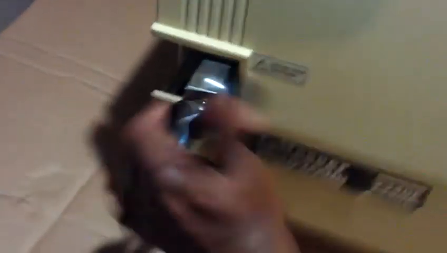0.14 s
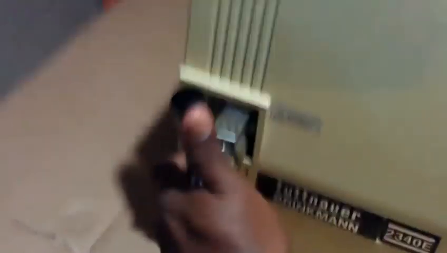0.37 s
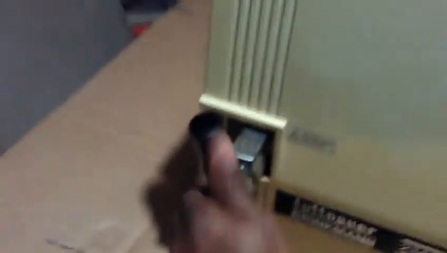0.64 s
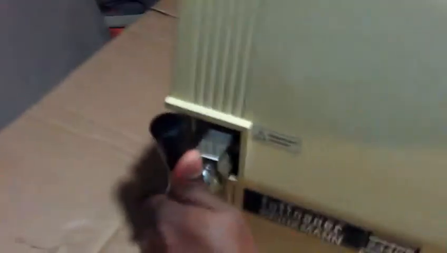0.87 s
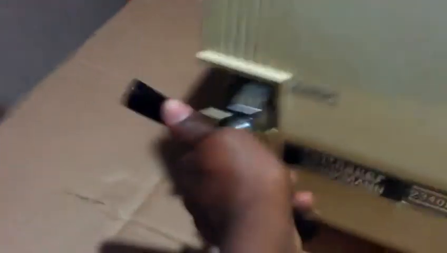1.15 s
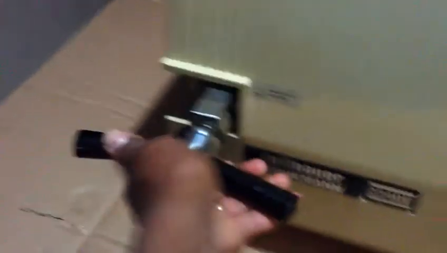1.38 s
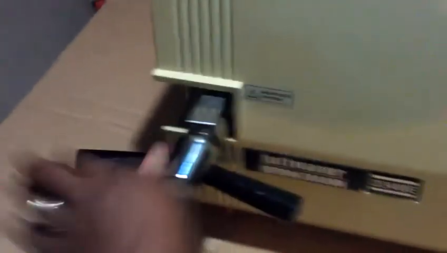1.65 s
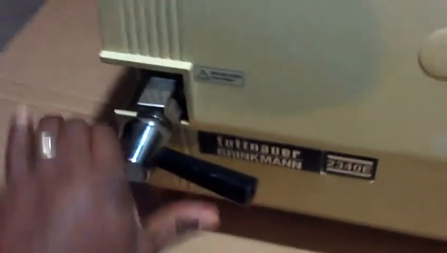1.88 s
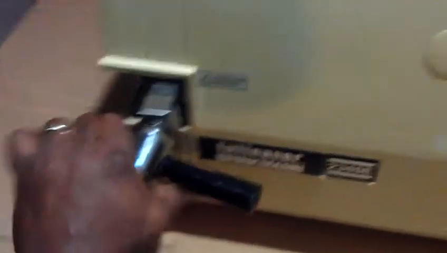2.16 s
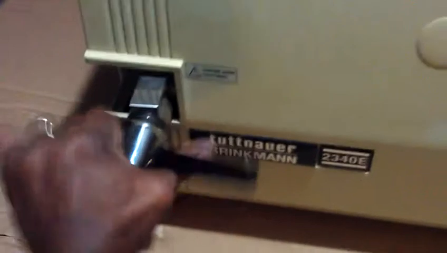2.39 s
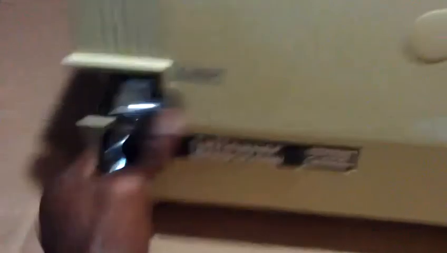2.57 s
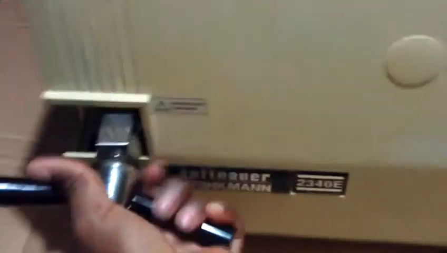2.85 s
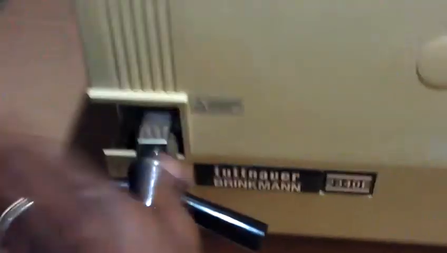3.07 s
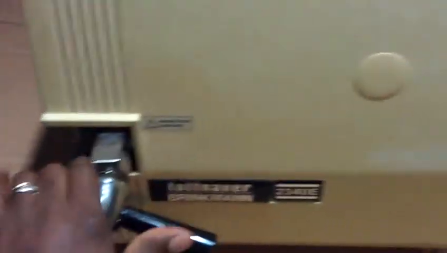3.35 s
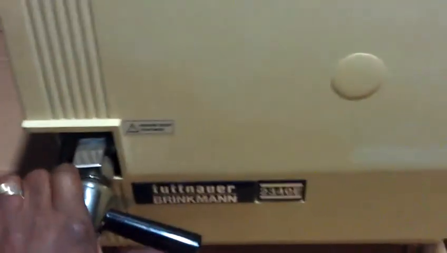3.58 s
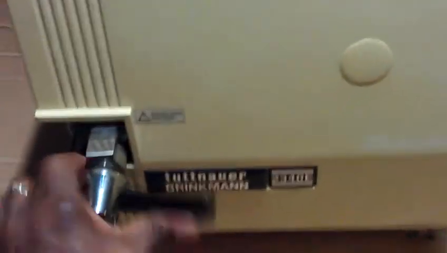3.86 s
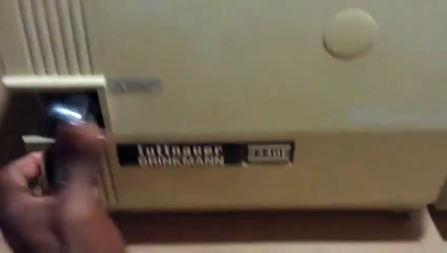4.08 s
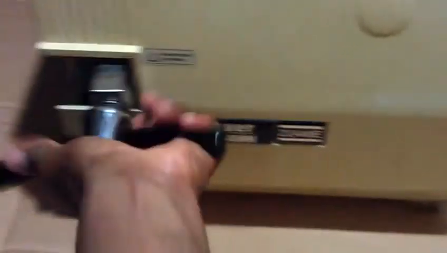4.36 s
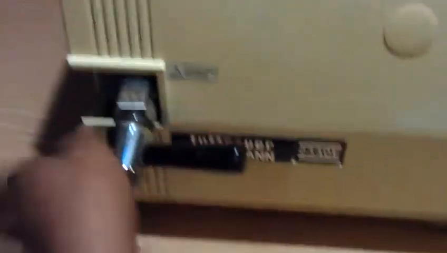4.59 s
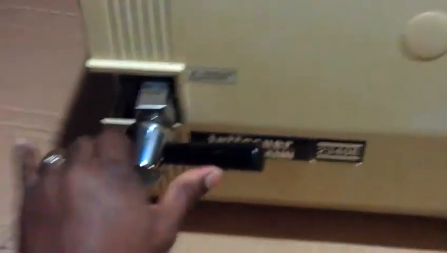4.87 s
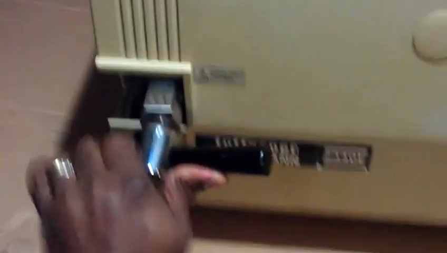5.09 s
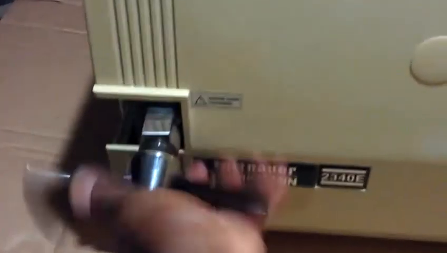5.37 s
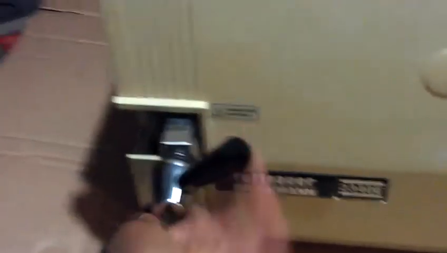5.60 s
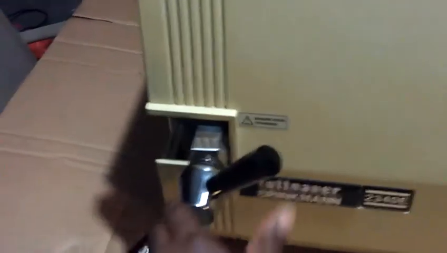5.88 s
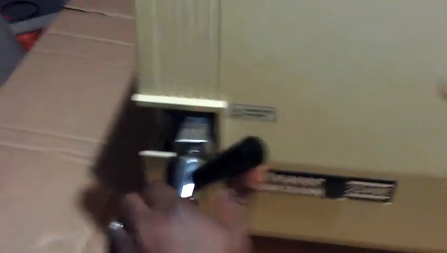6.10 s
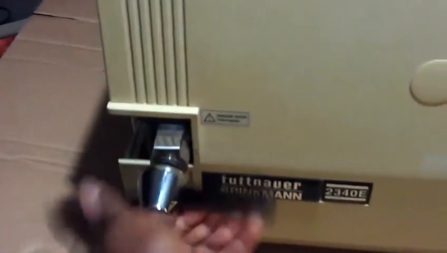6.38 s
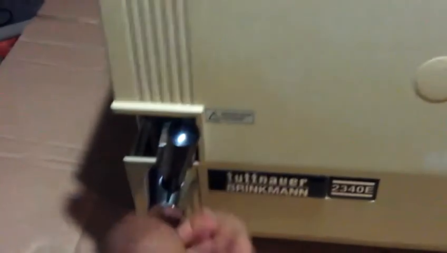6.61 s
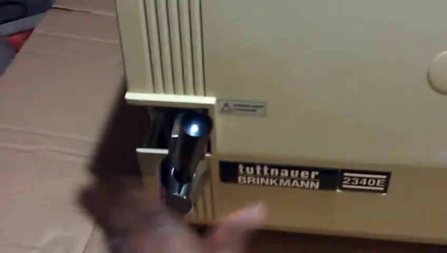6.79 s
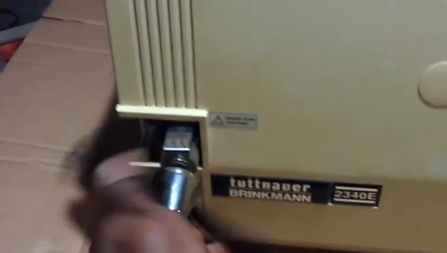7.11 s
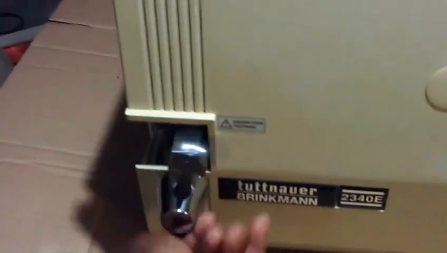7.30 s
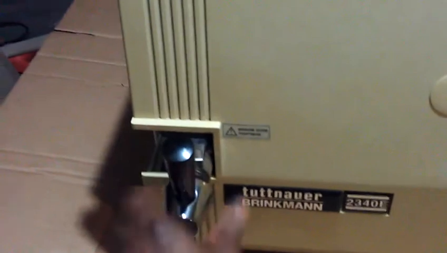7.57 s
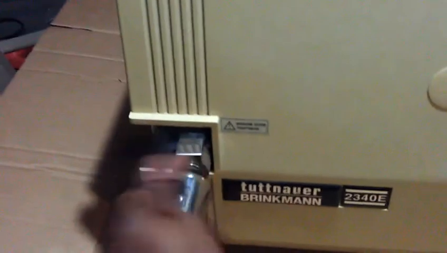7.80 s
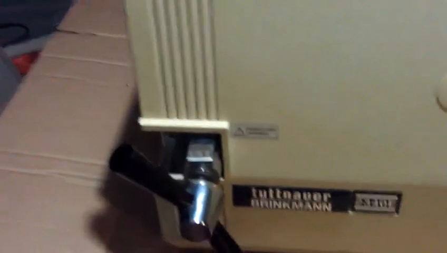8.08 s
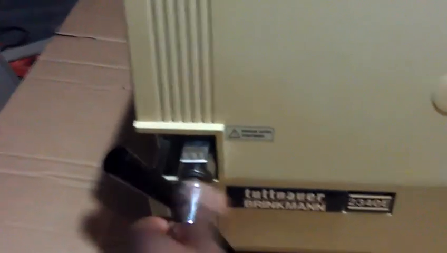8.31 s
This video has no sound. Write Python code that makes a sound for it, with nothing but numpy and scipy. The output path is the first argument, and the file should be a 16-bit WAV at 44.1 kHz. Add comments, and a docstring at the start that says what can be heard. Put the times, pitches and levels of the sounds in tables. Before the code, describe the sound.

Two bright, hard clanks within the first second, a quieter stretch of taps, then another clank and a rubbing turn. Further turns of the handle scrape and groan more heavily, with a strong clank past five seconds, then squeaks, a small metallic ping and soft door knocks. Close handheld pickup in a small room, with quiet hiss and a steady thin insect-like tone.

```python
"""Screw handle on a steel appliance door

A hand spins the handle close by. Noise bursts through steel resonances make the latch clank; the door booms.
Stick-slip noise makes the thread rub, and groan and shake the door more as load rises.
Sines make squeaks, tinks and pings; shaped noise makes finger taps and catches, palm brushes and soft pushes.
Behind are a faint high chorus like night insects, a low flutter, one far clack and the hiss of a small room."""
import sys
import numpy as np
from scipy import signal
from scipy.fft import rfft, irfft, next_fast_len
from scipy.io import wavfile
from scipy.ndimage import uniform_filter1d, map_coordinates

SR = 44100
rng = np.random.default_rng(int(sys.argv[2]) if len(sys.argv) > 2 else 0)


def to_wav(s):
    """Save 16-bit WAV."""
    ch = np.atleast_2d(s).T  # columns
    pcm = np.round(np.clip(ch, -1, 1) * 32767)  # PCM
    wavfile.write(sys.argv[1], SR, pcm.astype(np.int16))


N = 372644
TIME_S = np.arange(N) / SR
TOP_HZ = 13950
GRIP_S, SPEED_UP_DB = 0.043, 8  # a turn takes hold this fast, then swells as the handle gains speed

# Spectrum of the room hiss. Each row: frequency in Hz, relative density in dB per Hz.
AIR_SPECTRUM = [(25, -52), (50, -63), (85, -20.5), (150, -8), (380, -8.5), (620, -11), (830, -3.5),
                (1200, -10), (1700, -5.5), (2500, -15), (4000, -16.5), (5600, -25), (7400, -36),
                (10500, -17.5), (14000, -28.5)]
# Spectrum of the insect chorus. Each row: frequency in Hz, relative density in dB per Hz.
CHORUS_SPECTRUM = [(5600, -11.5), (6050, -7.5), (6330, 8.5), (6550, 8.5), (6720, 2), (6900, -84),
                   (7100, -60)]
# Decay of the room. Each row: frequency in Hz, t60 in seconds.
ROOM_DECAY = [(150, 1), (450, 0.72), (1500, 0.35), (5000, 0.25), (12000, 0.29)]
# Stereo likeness of all noise. Each row: frequency in Hz, left-right correlation from -1 to 1.
STEREO_LIKENESS = [(60, -0.56), (180, 0.99), (300, 0.89), (480, -0.15), (900, -0.14), (2000, 0.13),
                   (11000, 0.23)]
# Stereo lean of the near sounds. Each row: frequency in Hz, left over right in dB.
LATCH_LEAN = [(150, 3), (500, 2), (1200, -2.5), (2500, 1.5), (4500, -1.5), (9000, 0), (13000, 14.5)]
# Fingers and a ring tap the handle. Each row: start in seconds (plus a fixed lag), relative level in dB.
TAPS_LIST = [(0.0265, -28), (1.492, -26.5), (1.5064, -28), (1.5345, -25), (2.2014, -25.5), (2.926, -24.5),
             (3.369, -32), (3.444, -31), (3.753, -24.5), (4.487, -33), (4.6877, -24.5), (4.7562, -30.5),
             (7.475, -30.5)]
# The palm slides over the grip. Each row: start in seconds, length in seconds, level in dB.
PALM_BRUSHES = [(0.466, 0.068, -39.5), (3.082, .06, -53), (3.362, 0.14, -51), (6.634, 0.093, -50),
                (8.114, .07, -49)]
# Spectrum of skin and thread hiss. Each row: frequency in Hz, relative density in dB per Hz.
RUB_HISS_SPECTRUM = [(5000, -40), (7500, -8.5), (9000, -1.5), (10500, 4), (12000, 0), (14000, -11.5)]
# The hand rocks the door on its hinges. Each row: start in seconds, relative level in dB.
DOOR_THUDS = [(0.255, -32.5), (0.47, -34), (1.668, -31.5), (2.935, -33.5), (2.986, -35.5), (3.041, -33.5),
              (3.303, -34.5), (4.204, -32), (5.239, -39), (5.876, -36), (6.336, -29.5), (6.382, -34),
              (6.418, -32.5), (7.21, -28), (7.275, -25.5), (7.842, -31.5), (7.982, -35)]
# Low modes of the door panel. Each row: nominal frequency in Hz, relative level in dB, t60 in seconds.
DOOR_MODES = [(143.8, -4, 0.49), (176, 0.5, 0.42), (184, 3, 0.25), (222, 0, 0.23)]
# Low response of the door. Each row: frequency in Hz, relative level in dB.
DOOR_RUMBLE = [(53, -53), (90, -42), (177, 4), (220, -8), (295, -0.5), (407, -7), (497, -3.5), (723, -13),
               (800, -16.5), (1040, -8), (1760, -120)]
# Resonances of latch and bracket. Each row: frequency in Hz, width before damping in Hz, relative level in dB.
STEEL_MODES = [(300, 14, -4), (358, 8.5, 10), (438.6, 8.3, 11.5), (574, 54, 4.5), (837, 22, 4),
               (1067, 54, 4.5), (1433, 290, 0), (1697, 165, 6), (2540, 200, -5.5), (2836, 123, 0.5),
               (3550, 640, -13), (4080, 62, 2), (4500, 94, -9), (4890, 67, 4), (4950, 640, -0.5),
               (5400, 67, -5.5), (9900, 670, -23), (10180, 100, -5), (11120, 350, -5), (10900, 2040, -9),
               (12500, 150, -20)]
# Turns of the handle. Each row: start in seconds, length in seconds, relative rub in dB, thread load in dB.
HANDLE_TURNS = [(2.473, 0.28, -43, -17), (3.914, 0.47, -44.5, -4.5), (5.131, 0.32, -43, -2),
                (6.172, .29, -43.5, 0), (7.096, .2, -44.5, 7), (7.817, 0.13, -41.5, 6.5)]
# Colour of the thread's scrape. Each row: frequency in Hz, relative level in dB.
SCRAPE_SPECTRUM = [(500, -36), (900, 2.5), (1500, -1), (2200, 6), (3200, -0.5), (5000, -3.5), (7000, -28)]
# Resonances of the loaded screw. Each row: frequency in Hz, width before squaring in Hz, relative level in dB.
GROAN_MODES = [(1075, 60, -1), (1472, 113, 0.5)]
# Squeaks, tinks and pings of the metal. Each row: start in seconds, length in seconds, pitch in Hz, width in Hz,
# level in dB.
METAL_TONES = [(2.026, 0.016, 1556, 28, -31), (2.025, 0.006, 5670, 350, -27),
               (2.614, 0.14, 3130, 140, -41.5), (2.735, 0.092, 3320, 510, -45),
               (3.4, 0.0071, 2560, 640, -29), (3.44, 0.0067, 2340, 430, -31),
               (3.493, 0.0085, 2330, 410, -36.5), (5.55, 0.052, 1120, 14, -44),
               (6.195, 0.11, 1525, 82, -35), (6.408, 0.027, 1540, 89, -23), (6.427, 0.055, 3610, 27, -40.5),
               (6.46, 0.038, 3090, 170, -34), (7.151, 0.031, 3560, 48, -34), (7.972, 0.037, 3020, 9.9, -33)]
# Groups of modes in a clank. Each row: low edge in Hz, high edge in Hz.
CLANK_BANDS = [(250, 700), (720, 1250), (1300, 2000), (2200, 3700), (3700, 6300), (8200, 12500)]
# Relative level of each group in dB, at zero brightness.
CLANK_BAND_DB = [-28.5, -24.5, -18.5, -19.5, -19.5, -20.5]
# The latch hits a stop. Each row: start in seconds (plus a fixed lag), strength in dB, brightness in dB per
# octave, bracket clunk in dB, relative door level in dB, chatter time in seconds.
LATCH_CLANKS = [(0.135, -15, 3, 0.5, -26, 0.0044), (1.027, -12, -0.07, -2, -37, .0065),
                (2.027, -34.5, -5, -4, -49, 0.0052), (2.381, -17, -0.5, 1, -30, 0.0085),
                (3.873, -22, -0.9, 3.5, -38, 0.0061), (5.376, -11.5, .3, -5, -23.5, 0.0056),
                (6.29, -25.5, -0.1, 0.5, -55, 0.0052), (6.414, -41.5, -8.5, 10, -42, 0.005),
                (7.157, -28, -3.5, 0, -61, .004), (7.24, -29, 0.5, -0.5, -48, 0.0015),
                (7.956, -28.5, -2.5, 0.5, -37, 0.0087)]


def amp(db):
    """Decibels to gain."""
    return 10 ** (np.asarray(db) / 20)


def unit(x):
    """x at rms 1."""
    return x / np.sqrt(np.mean(x ** 2) + 1e-20)


def along(points, hz):
    """Interpolate (Hz, value) points on a log-frequency axis."""
    points_hz, values = np.transpose(points)
    return np.interp(np.log(hz + 1), np.log(points_hz + 1), values)


def wobble(knots_per_s):
    """A smooth random curve through normal draws."""
    knots = rng.standard_normal(int(N * knots_per_s / SR) + 4)
    return map_coordinates(knots, [TIME_S * knots_per_s])


def filtered(x, response):
    """x times a complex response of frequency."""
    n = x.shape[-1]
    padded = next_fast_len(n + SR // 10)
    spectrum = rfft(x, padded) * response(np.fft.rfftfreq(padded, 1 / SR))
    return irfft(spectrum, padded)[..., :n]


def noise(n, response=np.ones_like):
    """Coloured stereo noise of rms 1; mid and side are mixed for the likeness at each frequency."""
    def mid_side(hz):
        angle = np.arccos(np.clip(along(STEREO_LIKENESS, hz), -1, 1)) / 2
        return response(hz) * np.array([np.cos(angle), np.sin(angle)])

    mid, side = filtered(rng.standard_normal((2, n)), mid_side)
    return unit(np.array([mid + side, mid - side]))


def colour(points):
    """The response of a (Hz, dB) spectrum."""
    return lambda hz: amp(along(points, hz))


def peak(centre_hz, width_hz):
    """The response of one resonance."""
    return lambda hz: 1j * hz * width_hz / (centre_hz ** 2 - hz * hz + 1j * hz * width_hz)


def band(x, edges_hz):
    """A causal band-pass."""
    return signal.sosfilt(signal.butter(3, edges_hz, "band", fs=SR, output="sos"), x)


def add(track, start_s, sound):
    """Mix a sound into the track from start_s."""
    part = track[:, max(round(start_s * SR), 0):][:, :sound.shape[-1]]
    part += sound[..., :part.shape[1]]


def background(air_db=-46, whine_db=-59):
    """Room hiss as slowly drifting noise, with a faint wavering whine from a narrow resonance."""
    air = amp(air_db) * amp(.4 * wobble(4)) * noise(N, colour(AIR_SPECTRUM))
    whine = amp(whine_db) * noise(N, lambda hz: peak(1603, 22)(hz) ** 2)
    return air + whine


def flutter(rate_hz=17.0, decay_s=0.017, blur=0.58, start_db=-43.0, fade_db_per_s=1.45):
    """Soft low thuds in quick, uneven succession, slowly fading: noise under repeated short swells."""
    age_s = (rate_hz * TIME_S + .3 * wobble(9)) % 1 / rate_hz
    beats = blur + age_s / decay_s * np.exp(.5 - (age_s / decay_s) ** 2 / 2)
    body = noise(N, colour([(40, -60), (120, -6.5), (180, 7.5), (430, 12.5), (560, 3.5), (700, 2), (2000, -19)]))
    level_db = start_db - fade_db_per_s * TIME_S + 2.1 * wobble(24)
    return amp(level_db) * beats * body


def shimmer():
    """Random gain with quick and slow variation."""
    return amp(1.1 * wobble(65) + .8 * wobble(7))


def insects(chorus_db=-48.5, trill_db=-51, chirp_db=-52, chirp_hz=2.62, first_s=0.73):
    """Narrow noise bands: a high blurred chorus, a lower trill, and one thin voice chirping almost steadily."""
    chorus = amp(chorus_db) * shimmer() * noise(N, colour(CHORUS_SPECTRUM))
    trill = amp(trill_db) * shimmer() * noise(N, lambda hz: peak(2935, 360)(hz) ** 4)
    beat = np.cos(2 * np.pi * (chirp_hz * (TIME_S - first_s) + .1 * wobble(1)))
    voice = noise(N, lambda hz: peak(6135, 45)(hz) ** 2)
    return chorus + trill + amp(chirp_db) * np.clip(2 * beat, 0, 1) * voice


def room(x, build_s=0.001):
    """The room's answer, a fresh noise tail each time; each frequency dies at its own speed."""
    hz, t_s, cells = signal.stft(noise(SR // 2), SR, nperseg=256)
    decay = amp(-60 * t_s / along(ROOM_DECAY, hz)[:, None])
    tail = signal.istft(cells * decay * (1 - np.exp(-t_s / build_s)), SR, nperseg=256)[1]
    return signal.fftconvolve(x, tail / np.linalg.norm(tail[0]), axes=1)[:, :x.shape[1]]


def far_clack(start_s=.33, level_db=-45, direct_db=-8, t60_s=0.036):
    """One clack further off, a decaying noise burst heard mostly through the room."""
    out, t_s = np.zeros((2, N)), np.arange(SR // 2) / SR
    spectrum = [(400, -21), (1500, -4), (2500, -1), (4500, 0), (7000, -20), (10500, -6), (13000, -30)]
    clack = unit(noise(len(t_s), colour(spectrum)) * amp(-60 * t_s / t60_s))
    add(out, start_s, amp(level_db) * (amp(direct_db) * clack + room(clack)))
    return out


def echo(x, delay_s=.0105, echo_db=-11):
    """The floor below sends back one clear, quick reflection, left and right swapped."""
    delayed = np.pad(x[::-1], ((0, 0), (round(delay_s * SR), 0)))[:, :N]
    return x + amp(echo_db) * delayed


def fingers(ticks_per_s=6, ticks_db=-49, spread_db=5.0, life_s=.005):
    """Skin catches on the handle now and then: tiny dry noise ticks of random size."""
    chance, size = rng.random(N), np.minimum(rng.exponential(size=N), 3)
    catches = (chance < ticks_per_s / SR) * amp(ticks_db + spread_db * size)
    fading = signal.lfilter([1], [1, -np.exp(-1 / (life_s * SR))], catches)
    return fading * noise(N, colour([(3000, -31), (8000, -10), (11000, 7), (14000, 3)]))


def taps(room_db=-11, t60_s=.008, lag_s=0.00059):
    """Light, bright touches that hardly ring the metal: very short noise bursts."""
    out, t_s = np.zeros((2, N)), np.arange(SR // 4) / SR
    spectrum = [(500, -25), (2500, 6.0), (7000, -12), (11000, 7.5), (14000, -11)]
    for start_s, db in TAPS_LIST:
        burst = noise(len(t_s), colour(spectrum)) * amp(-60 * t_s / t60_s)
        tick = amp(db - 27) * unit(burst)
        add(out, start_s + lag_s, tick + amp(room_db) * room(tick))
    return out


def brushes():
    """Skin hisses over the grip in a short half-sine swell."""
    level = sum(amp(db) * np.sin(np.pi * np.clip((TIME_S - start_s) / length_s, 0, 1))
                for start_s, length_s, db in PALM_BRUSHES)
    return level * noise(N, colour(RUB_HISS_SPECTRUM))


def steel(hz, least_width=.035):
    """All latch resonances; the gripping hand damps each to at least a small share of its pitch."""
    return sum((-1) ** k * amp(db) * peak(centre_hz, max(width_hz, least_width * centre_hz))(hz)
               for k, (centre_hz, width_hz, db) in enumerate(STEEL_MODES))


def panel(hz, flat_gain=0.85):
    """The door's low response, coloured by the latch bolted to it."""
    return colour(DOOR_RUMBLE)(hz) * (steel(hz) + flat_gain)


def shudder(t_s, attack_s=0.005, t60_s=0.15):
    """The door shakes roughly on its hinges: decaying low noise."""
    return amp(-60 * t_s / t60_s) * (1 - np.exp(-t_s / attack_s)) * noise(len(t_s), panel)


def boom(t_s, swell_s=0.01):
    """The door panel swells into its low modes, detuned at random each time."""
    modes = sum(amp(db - 60 * t_s / t60_s) * np.sin(2 * np.pi * hz * t_s * rng.normal(1, 0.018))
                for hz, db, t60_s in DOOR_MODES)
    return modes * (1 - np.exp(-t_s / swell_s))


def thuds(level_db=2.5):
    """A soft push shakes the door without a clank."""
    out, t_s = np.zeros((2, N)), np.arange(SR // 5) / SR
    for start_s, db in DOOR_THUDS:
        add(out, start_s, amp(level_db + db) * shudder(t_s))
    return out


def stroke(start_s, length_s, release_s):
    """Level of one turn: it takes hold, gains speed and dies away in release_s (t60)."""
    t_s = TIME_S - start_s
    speed_db = SPEED_UP_DB * (np.clip(t_s / length_s, 0, 1) - 1)
    release_db = -60 * np.maximum(t_s - length_s, 0) / release_s
    return np.clip(t_s / GRIP_S, 0, 1) * amp(speed_db + release_db)


def groan_response(hz):
    """The loaded screw's resonances, each squared to narrow it."""
    return sum(amp(db) * peak(centre_hz, width_hz)(hz) ** 2 for centre_hz, width_hz, db in GROAN_MODES)


def thread(slip_hz=75, slip_decay_s=0.0076, dull_gain=0.3, rumble_db=3, groan_db=0, scrape_db=4.5, hiss_db=-1,
           scrape_per_load=0.16, rub_release_s=0.26, door_release_s=0.29, uneven_db=2.15):
    """The screw sticks and slips: uneven jolts ring the latch; more load groans and shakes the door more."""
    hiss, scrape, strain = np.zeros((3, N))
    for start_s, length_s, db, load_db in HANDLE_TURNS:
        rub_stroke = stroke(start_s, length_s, rub_release_s)
        hiss += amp(db) * rub_stroke
        scrape += amp(db + scrape_per_load * load_db) * rub_stroke
        strain += amp(db + load_db) * stroke(start_s, length_s, door_release_s)

    slip_age_s = (slip_hz * TIME_S + 0.59 * wobble(40)) % 1 / slip_hz
    jolts = .35 + np.exp(-slip_age_s / slip_decay_s) * amp(2 * wobble(90))
    grind = unit(filtered(noise(N) * jolts, lambda hz: (steel(hz) + dull_gain) * colour(SCRAPE_SPECTRUM)(hz)))
    shake = unit(filtered(noise(N) * jolts, panel))
    groan = unit(filtered(noise(N) * jolts, groan_response))

    rub = amp(scrape_db) * scrape * grind + amp(hiss_db) * hiss * noise(N, colour(RUB_HISS_SPECTRUM))
    loaded = strain * (amp(rumble_db) * shake + amp(groan_db) * groan)
    pressure = amp(uneven_db * wobble(35))  # the hand never pushes evenly
    return pressure * (rub + loaded)


def metal_tones(room_db=-8):
    """A brief tone at one pitch: a sine, rougher the more its phase jitters."""
    out, t_s = np.zeros((2, N)), np.arange(SR // 3) / SR
    for start_s, length_s, hz, width_hz, db in METAL_TONES:
        swell = np.sin(np.pi * np.minimum(t_s / length_s, 1))
        jitter = uniform_filter1d(rng.standard_normal((2, len(t_s))), size=60)
        phase_drift = np.cumsum(jitter, 1) * np.sqrt(2 * np.pi * width_hz / SR)
        tone = amp(db) * np.sqrt(2) * swell * np.sin(2 * np.pi * hz * t_s + phase_drift)
        add(out, start_s, tone + amp(room_db) * room(tone))
    return out


def clanks(crack_gain=0.14, rattle_gain=0.13, settle_s=0.009, boom_db=0, shudder_db=4, door_lag_s=0.0093,
           room_db=-9.0, attack_s=0.00017, lag_s=.0008):
    """Metal chatters on metal for a few ms and rings the latch; the heavy door answers a moment later."""
    out, t_s = np.zeros((2, N)), np.arange(SR // 2) / SR
    late_s = np.maximum(t_s - door_lag_s, 0)
    octaves = np.log2(np.mean(CLANK_BANDS, axis=1) / 2000)
    for start_s, strength_db, brightness, clunk_db, door_db, chatter_s in LATCH_CLANKS:
        contact = np.exp(-(t_s / chatter_s) ** 2) + rattle_gain * np.exp(-t_s / settle_s)
        force = noise(len(t_s)) * (1 - np.exp(-t_s / attack_s)) * contact
        ring = filtered(force, lambda hz: steel(hz) + crack_gain)
        # a harder contact favours the higher groups of modes
        levels_db = strength_db + np.array(CLANK_BAND_DB) + brightness * octaves
        levels_db[2] += clunk_db  # this group belongs to the bracket
        blow = sum(amp(db) * unit(band(ring, edges_hz)) for db, edges_hz in zip(levels_db, CLANK_BANDS))
        door = amp(boom_db) * boom(late_s) + amp(shudder_db) * shudder(late_s)
        add(out, start_s + lag_s, blow + amp(room_db) * room(blow) + amp(door_db) * door)
    return out


def scene():
    """The near latch, leaning left most in its highest ring, over far sounds slightly to the left."""
    far = far_clack() + insects() + flutter() + background()
    reflected = echo(clanks() + taps() + fingers())
    near = reflected + thuds() + thread() + brushes() + metal_tones()
    latch = filtered(near, lambda hz: amp(np.outer([.5, -.5], along(LATCH_LEAN, hz))))
    return latch + far * amp([[.6], [-.6]])


def record(dry):
    """Soft-limit peaks towards full scale, then remove everything from TOP_HZ up."""
    limited = dry / (1 + np.abs(dry) ** 6) ** (1 / 6)
    return filtered(limited, lambda hz: hz < TOP_HZ)


dry = scene()
out = record(dry)
to_wav(out)
```